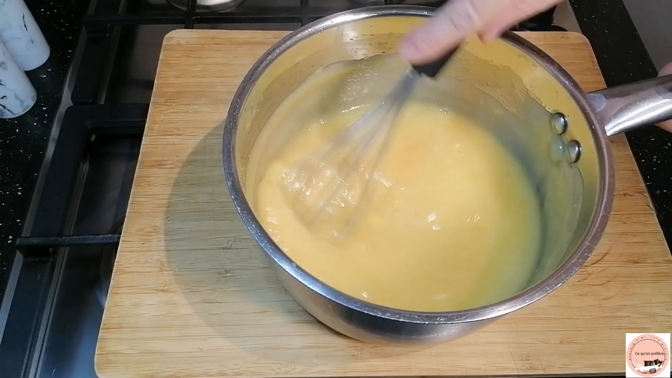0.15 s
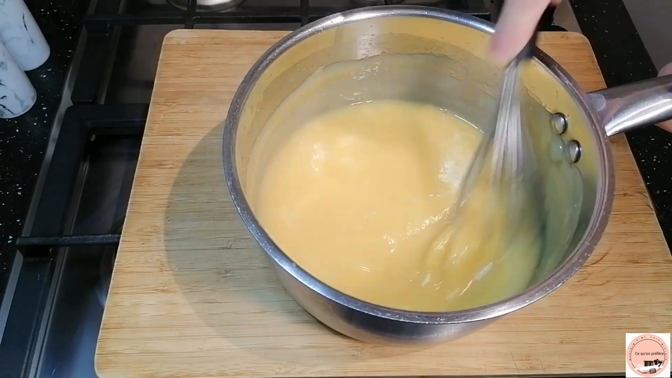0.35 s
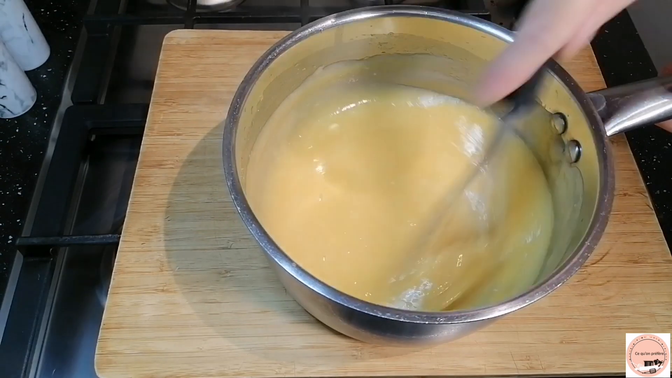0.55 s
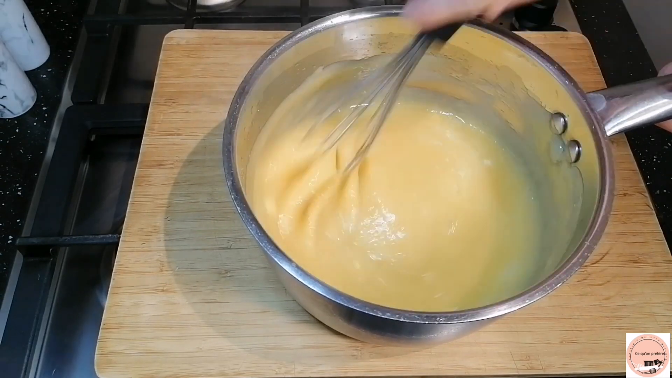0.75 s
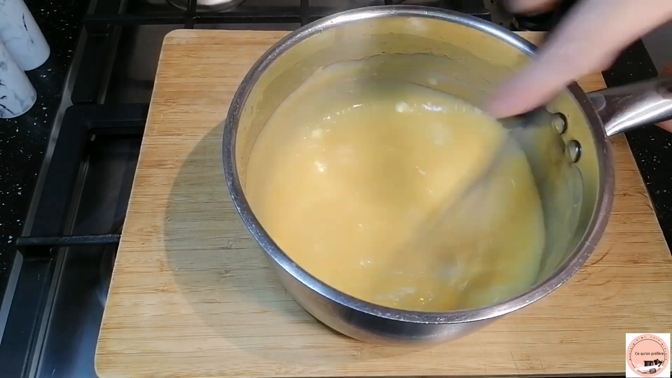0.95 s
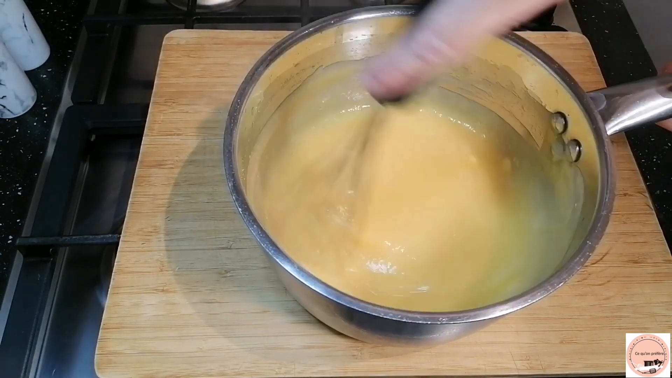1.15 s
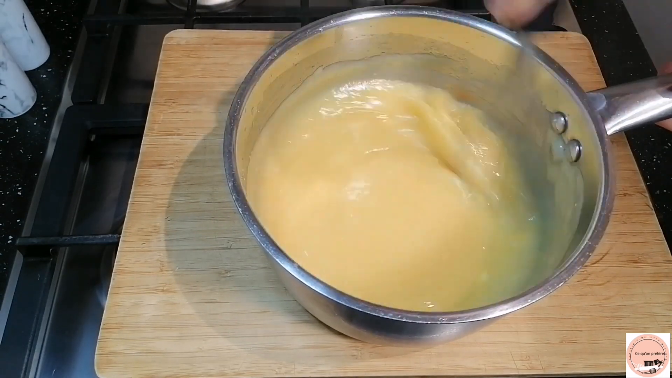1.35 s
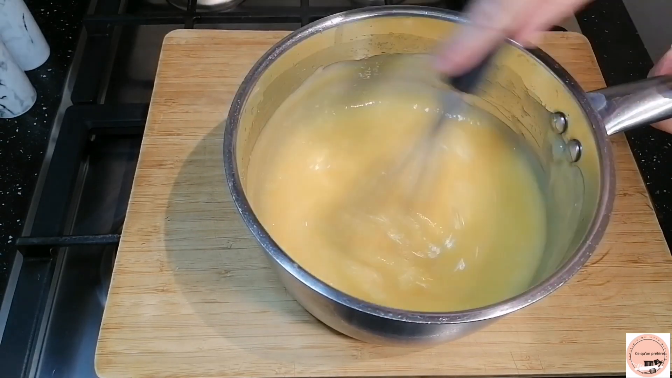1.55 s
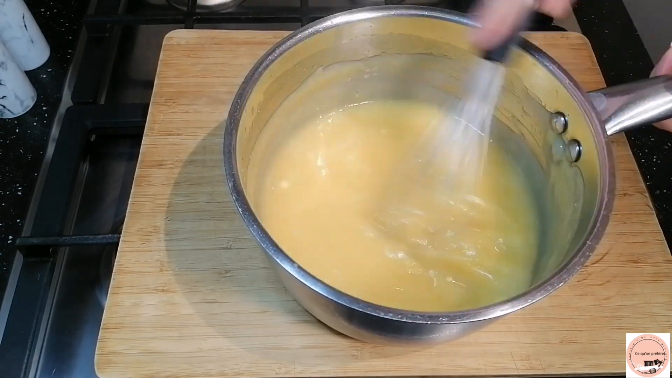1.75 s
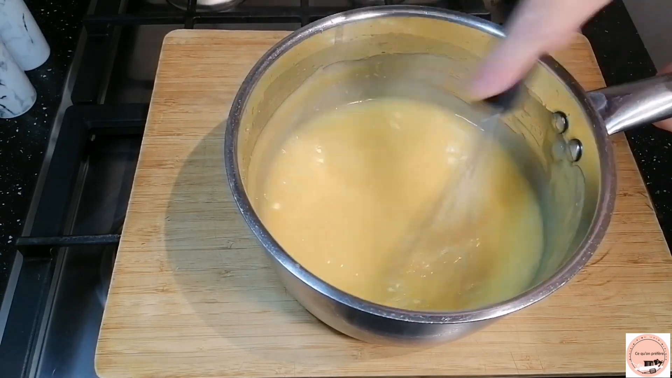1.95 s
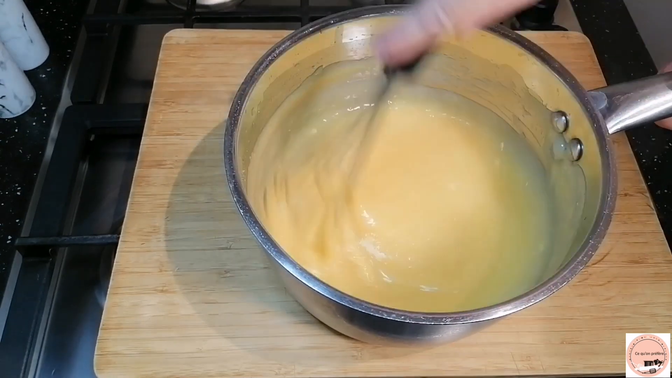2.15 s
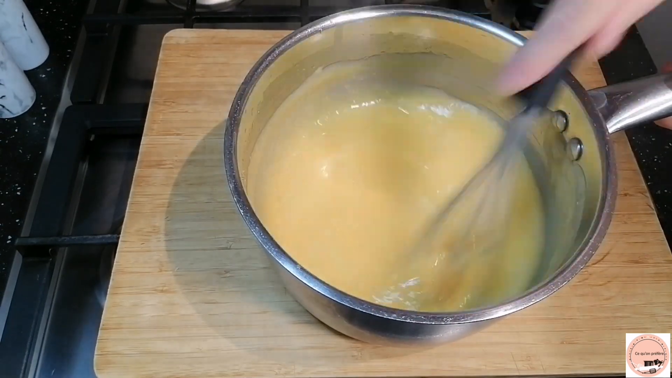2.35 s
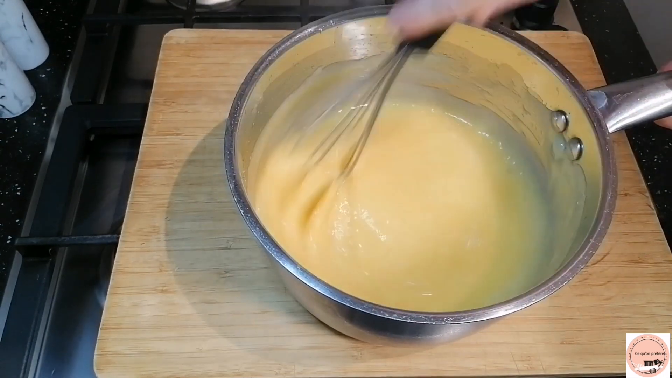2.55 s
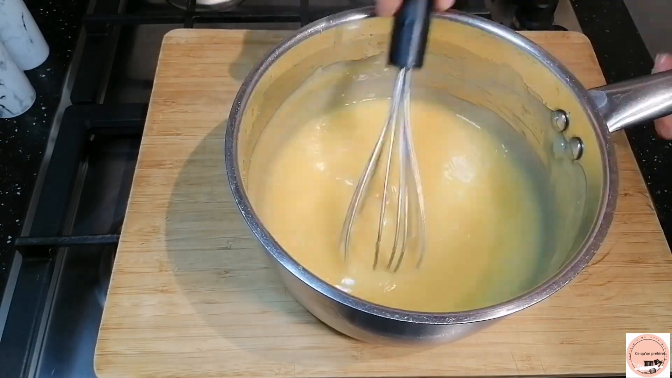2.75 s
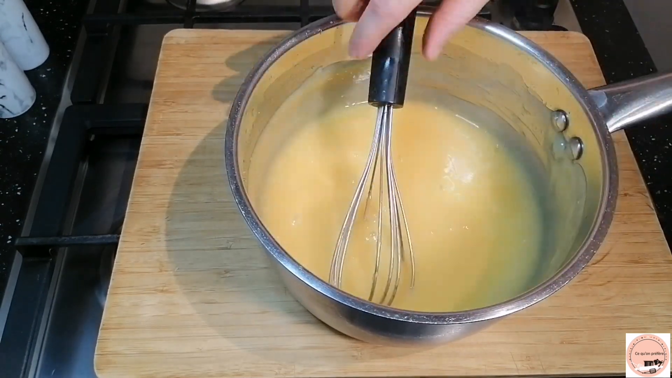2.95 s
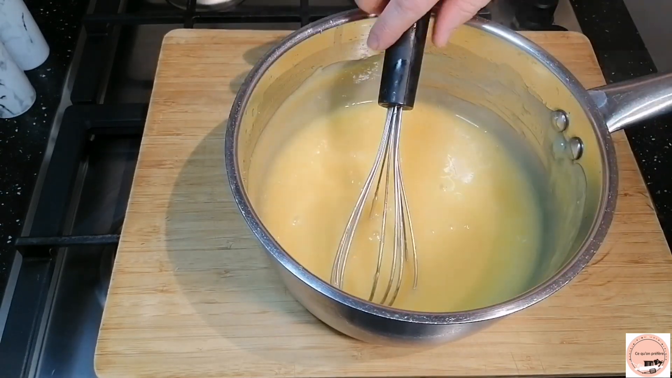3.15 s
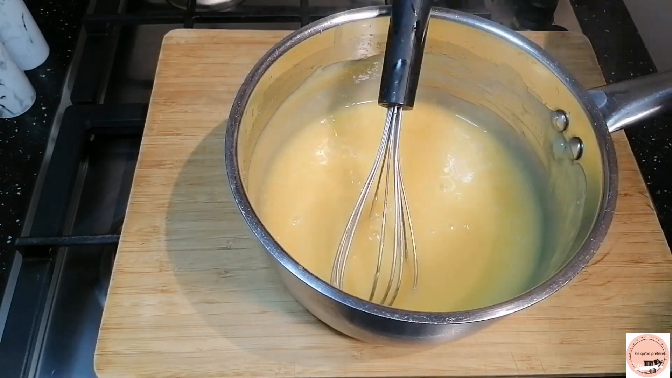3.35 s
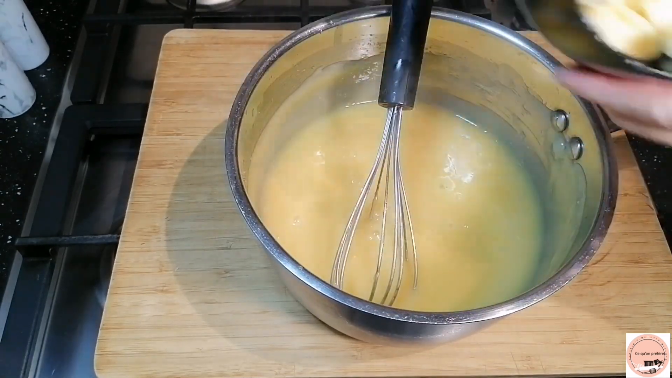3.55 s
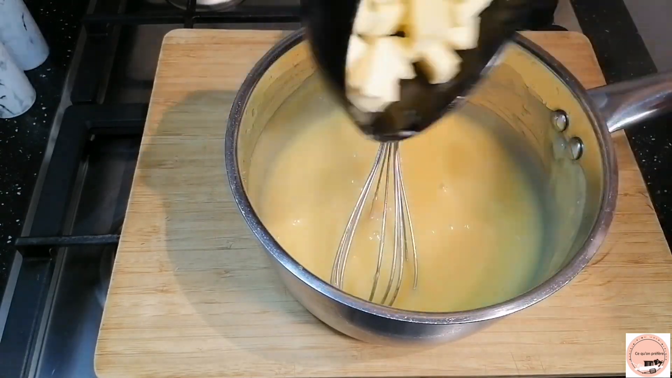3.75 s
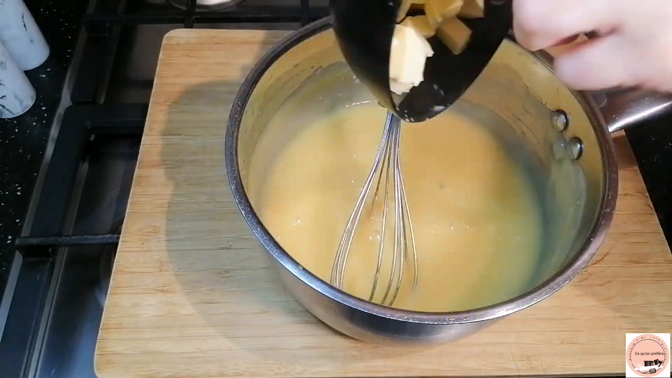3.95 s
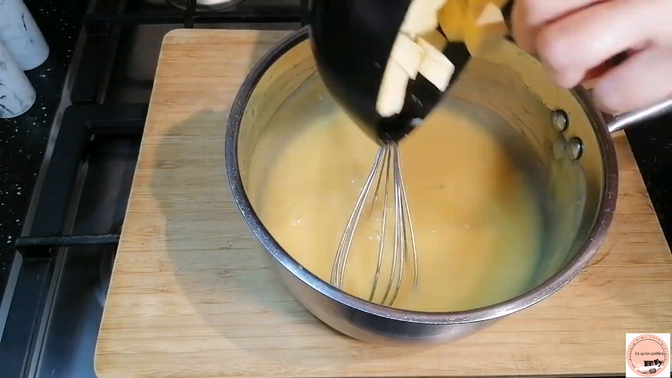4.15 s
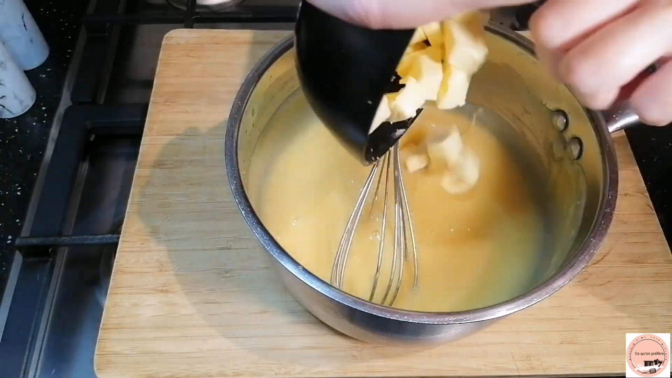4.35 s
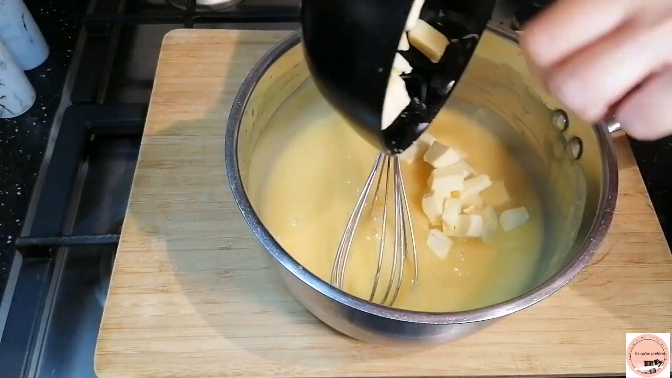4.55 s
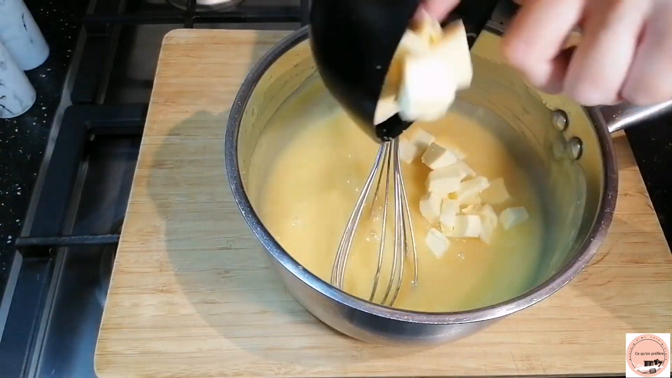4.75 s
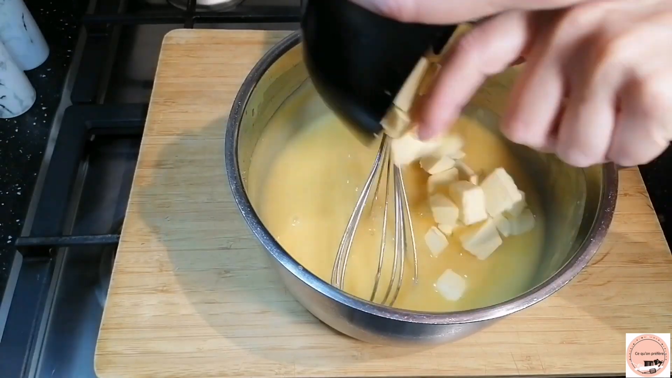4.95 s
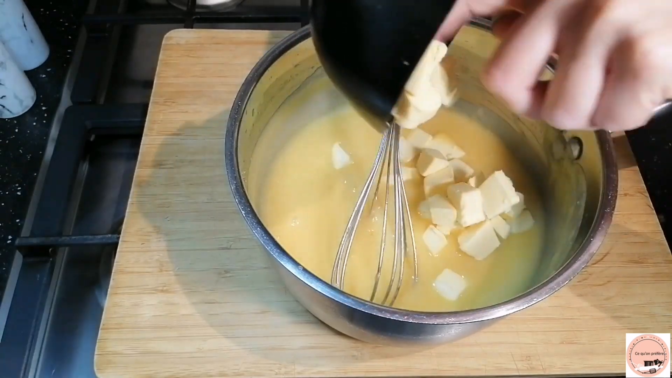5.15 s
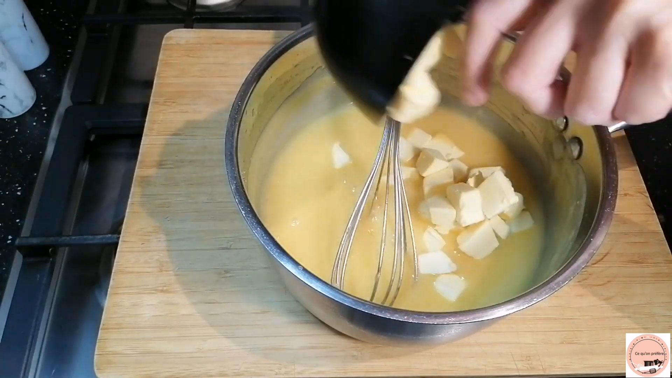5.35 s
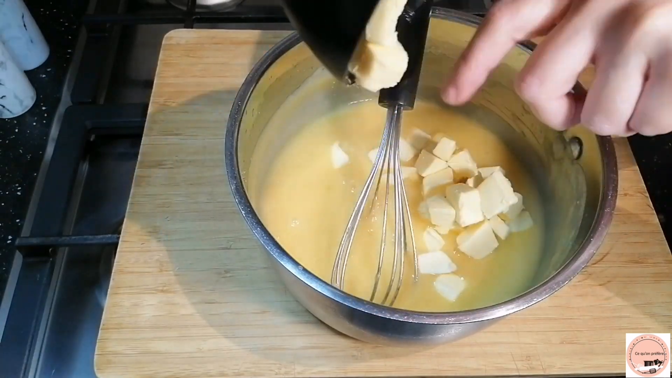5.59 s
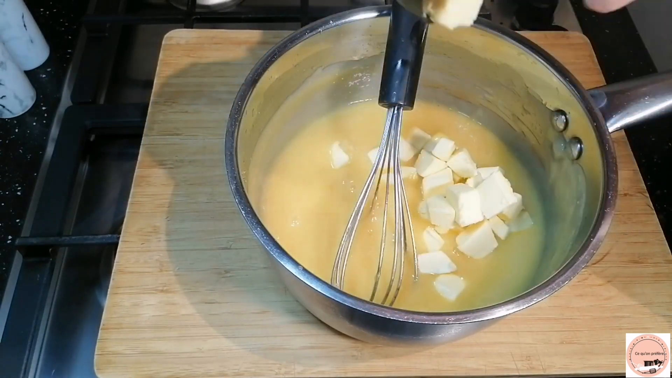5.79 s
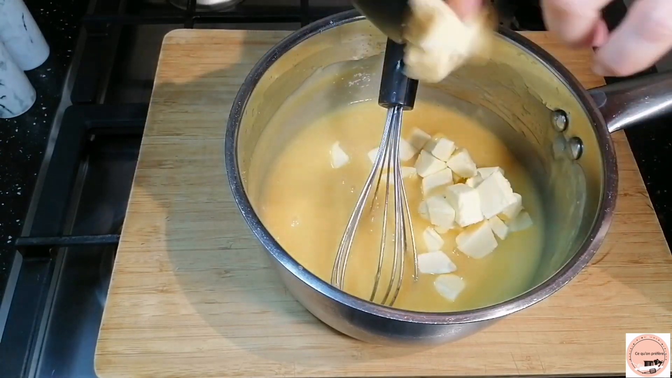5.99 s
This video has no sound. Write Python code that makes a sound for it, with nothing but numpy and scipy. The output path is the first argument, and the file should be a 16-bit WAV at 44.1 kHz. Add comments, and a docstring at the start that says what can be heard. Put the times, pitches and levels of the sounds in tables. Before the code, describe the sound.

Close up in a quiet kitchen, a wire whisk beats thick cream in a steel saucepan: quick bright scrapes, thin wire ringing, pan taps and soft gurgles, with dull bumps on a wooden board. It slows, and the dropped handle clatters sharply on the rim. Then quiet hush, faint rubbing and squeaks of a plastic bowl, and small sticky smacks as butter cubes drop into the cream.

```python
"""A wire whisk beats thick cream in a steel saucepan on a wooden board: sliding and tapping wires excite a bright
hiss, wire ring and pan ring, cream gurgles as bending resonances, and bumps are damped low sines.
The whisk is let go and its handle chatters on the rim: impulses, noise cracks and damped pan modes.
Then a plastic bowl is handled with rubs, squeaks and clacks, and butter cubes smack and plop into the cream.
A quiet kitchen, heard from close by: a steady coloured-noise hush and a faint noise-tail reverb."""
import sys
import numpy as np
from scipy import signal
from scipy.fft import rfft, irfft, next_fast_len
from scipy.io import wavfile
from scipy.ndimage import map_coordinates

SR = 44100
rng = np.random.default_rng(int(sys.argv[2]) if len(sys.argv) > 2 else 0)


def dump(signal):
    """Clip the signal to [-1, 1] and save it as 16-bit WAV at the path in sys.argv[1]."""
    limited = np.clip(np.atleast_2d(signal).T, -1, 1)
    pcm = np.round(limited * 32767).astype(np.int16)
    wavfile.write(sys.argv[1], SR, pcm)


N = 265482
TIME = np.arange(N) / SR
SIZE = 2 * next_fast_len((N + SR) // 2)  # FFT length [samples]
HZ = np.fft.rfftfreq(SIZE, 1 / SR)
TOP_HZ = 15900

# wires sliding over the pan, one after another: (middle [s], hiss level [dB], pan ring level [dB])
SCRAPES = [(0.015, -40, -50), (0.049, -39.0, -46), (0.094, -38, -64.5), (0.161, -38.5, -43),
           (0.213, -42.0, -57), (0.267, -41, -75), (0.317, -41.5, -51.5), (0.353, -44, -55.5),
           (0.481, -43, -54.5), (0.539, -42.5, -44), (0.592, -42.0, -55.5), (0.627, -37, -49),
           (0.685, -40, -66), (0.737, -38.5, -49), (0.805, -38.5, -53), (0.849, -38.5, -43),
           (0.894, -38.5, -53), (0.94, -39, -58), (0.984, -41.0, -48), (1.038, -40.5, -49),
           (1.11, -38.5, -49), (1.207, -39.5, -51.5), (1.259, -40, -45), (1.327, -39.0, -45.5),
           (1.379, -41.5, -45.5), (1.444, -44.0, -48.5), (1.492, -42.5, -45.5), (1.574, -43.5, -60),
           (1.621, -40, -79), (1.676, -39.5, -67), (1.735, -38.0, -63), (1.79, -38, -55),
           (1.845, -39.0, -73), (1.891, -38, -55), (1.938, -39, -77), (2.03, -40.5, -69),
           (2.068, -41, -50.5), (2.119, -37.5, -45), (2.173, -39.5, -48.5), (2.229, -43, -63),
           (2.282, -38, -49.5), (2.358, -39, -56.0), (2.419, -40, -47), (2.454, -44.5, -48),
           (2.508, -39.0, -49), (2.57, -45, -49), (2.614, -44.5, -56.0), (2.679, -42, -52.5),
           (2.725, -48.5, -69), (2.769, -48.5, -52), (2.812, -59, -68)]
# spectra, normalised to unit power on use: (frequency [Hz], density [dB per Hz])
HISS_SPECTRUM = [(2240, -22.5), (3800, -19), (4950, -5.5), (6610, -1.5), (7500, 3.5), (8820, -10),
                 (9830, -6.5), (11000, -14), (15000, -14), (15900, -27)]
PAN_SPECTRUM = [(240, -26.5), (400, -18), (600, 0), (1160, -11), (1550, -11.5), (1920, -25.5),
                (2200, -18.5), (3500, -77)]
SLOSH_SPECTRUM = [(22, -39), (100, -15), (200, -13), (330, -5.5), (500, -3.5), (800, -17), (4000, -64)]
# resonances of filled pan and whisk, negative = antiresonance: (frequency [Hz], width [Hz], lift [dB])
STEEL_MODES = [(591, 99, 9.5), (735, 27, -2), (1076, 150, 6.5), (1301, 77, 9), (1914, 140, 6),
               (2990, 146, 6), (3470, 280, 6), (3716, 320, -4.5), (6510, 64, 10.5)]
# 1/e widths of the swells of single wire and wall notes
WIRE_NOTE_S, WALL_NOTE_S = .04, .022


def amp(db):
    """Decibels to gain."""
    return 10 ** (np.asarray(db) / 20)


def unit(x):
    """Scaled to rms 1."""
    return x / np.sqrt(np.mean(np.abs(x) ** 2) + 1e-20)


def along(points, hz=HZ):
    """(Hz, value) points joined on a log frequency axis."""
    f, v = np.transpose(points)
    return np.interp(np.log(hz + 1), np.log(f + 1), v)


def add(track, s, x):
    """Mix x into the track from time s."""
    i = round(s * SR)
    a, b = max(i, 0), min(i + x.shape[-1], N)
    track[..., a:b] += x[..., a - i:b - i]


def colour(x, spectrum, modes=()):
    """Minimum-phase filter of unit power: a smooth spectrum with resonances on it."""
    lift = sum(db / (1 + (2 * (HZ - hz) / width) ** 2) for hz, width, db in modes)
    gain = unit(amp(along(spectrum) + lift))
    # folding the cepstrum makes the filter causal
    cepstrum = irfft(np.log(np.maximum(gain, 1e-6)))
    cepstrum[1:SIZE // 2] *= 2
    cepstrum[SIZE // 2 + 1:] = 0
    response = np.exp(rfft(cepstrum))
    return irfft(rfft(x, SIZE) * response)[..., :N]


def stereo(pair, alike, lean):
    """A mid and side pair becomes left and right by likeness and balance; the mean keeps its level."""
    like = np.clip(along(alike), -.5, .99)
    width = np.sqrt((1 - like) / (1 + like))
    g = amp(along(lean) / 2)
    mid, side = rfft(pair, SIZE)
    norm = np.hypot(g + 1 / g, width * (g - 1 / g)) / 2
    left = (mid + width * side) * g
    right = (mid - width * side) / g
    return irfft(np.array([left, right]) / norm)[:, :N]


def swell(t, length_s):
    """Contact pressure around t = 0, of 1/e width length_s: it builds faster than it lets go."""
    skew = .38
    u = 2 * t / length_s + skew
    return np.exp(-(u / (1 + skew * np.sign(u))) ** 2)


def strike(t, build_s, t60_s):
    """Envelope of a tap: the wire presses in, then the ring dies."""
    return np.minimum(t / abs(build_s), 1) * amp(-60 * np.maximum(t - build_s, 0) / t60_s)


def burst(t60_s):
    """A pair of noise cracks that decay by 60 dB in t60_s."""
    t = np.arange(SR // 8) / SR
    return rng.standard_normal((2, len(t))) * amp(-60 * t / t60_s)


def ringing(n, ring_db, ring_hz):
    """Spectrum of a noise pair with chance resonances about ring_hz apart: every contact rings differently."""
    hz = np.fft.rfftfreq(n, 1 / SR)
    resonances = np.tanh(map_coordinates(rng.standard_normal(n), [hz / ring_hz], order=1))
    return rfft(rng.standard_normal((2, n))) * amp(ring_db * resonances)


def friction(length_s, ring_db, ring_hz, rough_db, slip_hz, glide):
    """One slide, centred in 0.2 s: uneven slips excite chance resonances, which bend in pitch."""
    n = SR // 5
    t = np.arange(n) / SR - 1 / 10
    rung = irfft(ringing(n, ring_db, ring_hz), 4 * n)  # 4x oversampled
    place = 4 * SR * (t + 1 / 10 + glide * rng.normal() * t ** 2)
    bent = np.array([np.interp(place, np.arange(len(r)), r) for r in rung])
    slips = map_coordinates(rng.standard_normal(n), [np.arange(n) * slip_hz / SR], order=1)
    judder = map_coordinates(rng.standard_normal(n), [np.arange(n) * 110 / SR], order=1)
    pressure = swell(t, length_s)
    x = bent * amp(rough_db * slips + 1.7 * judder) * pressure
    return unit(x) * np.sqrt(np.mean(pressure ** 2))


def note(length_s, hz, bend, fray):
    """A brief ring of wire or pan wall, centred in 0.2 s: pitch bends with flexing, slips fray the phase."""
    t = np.arange(SR // 5) / SR - 1 / 10
    drift = np.cumsum(fray * rng.standard_normal((2, len(t))), axis=1)
    bent_t = t + bend * rng.normal() * t ** 2
    return swell(t, length_s) * np.sin(2 * np.pi * hz * bent_t + drift)


def scrape_wires(hiss, wire, pan, notes):
    """Each sliding wire hisses, sings a note of its own and rings the cream-loaded pan lower down."""
    # how freely the wires sing, less when buried in the cream: (time [s], ring against hiss [dB])
    singing = [(.15, -3.5), (.45, -14), (.75, -7.5), (1.05, -15.5), (1.58, -6), (2.05, -9), (2.78, -4.5)]
    scrape_s, wire_ring_s, wire_stagger_s = .042, .046, .008
    # centre pitch, standard deviation of log pitch, level against wire or pan ring
    wire_hz, wire_spread, wire_note_db = 3295, .05, -6.5
    pan_hz, pan_spread, pan_note_db = 877, .35, -7.5
    for s, hiss_db, pan_db in SCRAPES:
        start = s - 1 / 10
        sings = start + wire_stagger_s * rng.normal()
        wire_db = hiss_db + np.interp(s, *np.transpose(singing))
        slide = friction(scrape_s, ring_db=10, ring_hz=130, rough_db=3, slip_hz=900, glide=.08)
        add(hiss, start, amp(hiss_db) * slide)
        wire_ring = friction(wire_ring_s, ring_db=20, ring_hz=130, rough_db=1, slip_hz=300, glide=.2)
        add(wire, sings, amp(wire_db - 5.5) * wire_ring)
        pan_ring = friction(.85 * scrape_s, ring_db=16, ring_hz=90, rough_db=2, slip_hz=200, glide=.9)
        add(pan, start, amp(pan_db) * pan_ring)
        high, low = rng.uniform(-np.sqrt(3), np.sqrt(3), 2)  # unit variance
        wire_note = note(WIRE_NOTE_S, wire_hz * np.exp(wire_spread * high), bend=.2, fray=.05)
        add(notes, sings, amp(wire_db + wire_note_db) * wire_note)
        pan_note = note(WALL_NOTE_S, pan_hz * np.exp(pan_spread * low), bend=.7, fray=.03)
        add(notes, start, amp(pan_db + pan_note_db) * pan_note)


def clear_notes(notes):
    """A wire catches and the pan wall sings one note, or a wire springs free and sings itself."""
    # clear notes: (middle [s], frequency [Hz], level [dB])
    wall_notes = [(.167, 823, -45), (0.271, 1264, -48), (.532, 714, -47), (.68, 1260, -48),
                  (1.075, 1480, -46.5), (1.88, 1053, -45.5), (1.939, 1288, -48), (2.514, 740, -42.5),
                  (2.785, 1824, -53)]
    wire_notes = [(.048, 3090, -50.5), (.097, 3290, -61), (.562, 3435, -48), (.658, 3477, -46),
                  (.87, 3130, -52), (.915, 3440, -42), (1.573, 2980, -47), (1.726, 3079, -44),
                  (2.27, 3025, -52.5)]
    for table, length_s in ((wall_notes, WALL_NOTE_S), (wire_notes, WIRE_NOTE_S)):
        for s, hz, db in table:
            add(notes, s - 1 / 10, amp(db) * note(length_s, hz, bend=.3, fray=.03))


def tap_pan(hiss, wire, pan, notes):
    """A wire strikes the pan: noise ticks, plus base and wall rings that the cream damps quickly."""
    # strikes: (time [s], tick level [dB], base ring level [dB], wall ring frequency [Hz],
    # wall ring level [dB], contact build [s])
    taps = [(0.374, -25.5, -44, 1055, -41, 0.0021), (.646, -41.5, -35, 810, -37, 0.0012),
            (0.768, -30.5, -28.5, 886, -34.5, 0.0027), (1.062, -31, -36.5, 1050, -39.5, 0.0066),
            (1.249, -46, -68, 744, -45.5, 0.0022), (1.389, -35.5, -52, 740, -40.5, 0.011),
            (1.537, -29.5, -36, 1272, -45, 0.0069), (2.11, -28, -36.5, 1400, -55, 0.0079),
            (2.18, -45, -35, 725, -38, 0.014), (2.308, -30.5, -34, 872, -36, 0.003),
            (2.644, -25, -34, 1082, -47, 0.0086)]
    base_hz, base_t60_s = 588.5, .056
    t = np.arange(SR // 8) / SR
    for s, tick_db, base_db, wall_hz, wall_db, build_s in taps:
        bright = unit(irfft(ringing(len(t), 8, 350), len(t)))
        dull = unit(irfft(ringing(len(t), 8, 130), len(t)))
        add(hiss, s, amp(tick_db - 2) * bright * strike(t, build_s, t60_s=.04))
        add(wire, s, amp(tick_db - 19) * bright * strike(t, build_s, t60_s=.045))
        add(pan, s, amp(base_db - 2.5) * dull * strike(t, build_s, t60_s=.05))
        for hz, db in ((base_hz, base_db), (wall_hz, wall_db)):
            add(notes[0], s, amp(db) * np.sin(2 * np.pi * hz * t) * strike(t, build_s, base_t60_s))


def click_wires(hiss):
    """Wires click against each other: short noise bursts."""
    # clicks: (time [s], level [dB])
    clicks = [(0.51, -32.5), (1.099, -30), (1.177, -32.5), (1.3, -35), (2.335, -40), (2.402, -39)]
    for s, db in clicks:
        add(hiss, s, amp(db) * burst(t60_s=.046))


def swish(hiss, pan):
    """Between scrapes the wires keep swishing through the cream: steady noise that fades as the whisk stops."""
    # the whisk slows and stops: (fade start [s], fade end [s])
    stop_s = [2.35, 2.84]
    stirring = np.interp(TIME, stop_s, [1, 0])
    for track, db in ((hiss, -53), (pan, -60)):
        add(track, 0, amp(db) * stirring * rng.standard_normal((2, N)))


def whisk():
    """Scrapes, taps, clicks and swish drive a bright hiss, the ring of the wires and the lower pan ring."""
    # wire ring spectrum: (frequency [Hz], density [dB per Hz])
    wire_spectrum = [(1120, -39), (1900, -8), (2150, -15), (2600, -4), (3500, -6.5), (3900, -15),
                     (6000, -74)]
    hiss, wire, pan, notes = np.zeros((4, 2, N))
    scrape_wires(hiss, wire, pan, notes)
    clear_notes(notes)
    tap_pan(hiss, wire, pan, notes)
    click_wires(hiss)
    swish(hiss, pan)
    bright = colour(hiss, HISS_SPECTRUM, STEEL_MODES) + colour(wire, wire_spectrum, STEEL_MODES)
    return bright + colour(pan, PAN_SPECTRUM, STEEL_MODES) + notes


def cream():
    """Air pockets gurgle, gliding in pitch: faintly behind each wire, louder where cream slops over."""
    # whisk slopping the cream over, or butter sliding into it: (middle [s], level [dB])
    slops = [(.466, -46), (.605, -48), (0.978, -47), (1.077, -45.5), (1.385, -48), (2.029, -45.5),
             (5.247, -58.5)]
    slop_s, churn_db = .029, -15.5  # churn level is against the pan ring
    slosh = np.zeros((2, N))
    for s, db in slops:
        slop = friction(slop_s, ring_db=8, ring_hz=60, rough_db=2, slip_hz=200, glide=4)
        add(slosh, s - 1 / 10, amp(db) * slop)
    for s, _, pan_db in SCRAPES:
        churn = friction(2 * slop_s, ring_db=8, ring_hz=70, rough_db=3, slip_hz=200, glide=2)
        add(slosh, s - 1 / 10, amp(pan_db + churn_db) * churn)
    return colour(slosh, SLOSH_SPECTRUM)


def kitchen_hush():
    """Steady background: coloured noise, nearly unrelated left and right above the bass."""
    # spectrum: (frequency [Hz], density [dB per Hz])
    floor_spectrum = [(12, -30.5), (20, -4.5), (74, -4), (198, -12), (642, -20.5), (1530, -27),
                      (7730, -33.5), (15500, -37)]
    # a hollow and a hump: (frequency [Hz], width [Hz], lift [dB])
    hush_modes = [(4200, 540, -5.5), (6800, 1000, 4.5)]
    # stereo: (frequency [Hz], left-right likeness [-]) and (frequency [Hz], left minus right [dB])
    floor_alike = [(60, 0.392), (950, 0.026)]
    floor_lean = [(60, 2), (950, 0)]
    noise = rng.standard_normal((2, N))
    return stereo(colour(noise, floor_spectrum, hush_modes), floor_alike, floor_lean)


def kitchen_reverb(x):
    """The walls answer: convolution with a noise tail whose bass lasts longest."""
    # decay: (frequency [Hz], t60 [s])
    decay = [(100, 1), (250, 0.15), (10000, 0.1)]
    hz, t, z = signal.stft(rng.standard_normal((2, SR // 2)), SR, nperseg=256)
    z = z * amp(-60 * t / along(decay, hz)[:, None])
    tail = signal.istft(z, SR, nperseg=256)[1]
    tail = np.pad(tail / np.linalg.norm(tail[0]), ((0, 0), (SR // 150, 0)))  # 1/150 s pre-delay
    return signal.fftconvolve(x[:1], tail, axes=1)[:, :N]


def board(board_hz=99, thump_db=7, thud_db=-3):
    """Pan bumps on the board: a damped bounce near board_hz over a shorter 70 Hz thud."""
    # pan pushed and rocking back: (time [s], level [dB])
    bumps = [(0.43, -40.5), (0.566, -35), (0.601, -40), (0.974, -42), (.998, -41), (1.134, -46),
             (1.249, -43.5), (1.389, -42.5), (1.498, -48.5), (2.012, -36.5), (2.135, -42.5), (2.888, -39.5),
             (4.392, -46.5), (4.512, -52), (4.882, -49), (4.995, -52.5)]
    thump, t = np.zeros((2, N)), np.arange(SR // 2) / SR
    for s, db in bumps:
        hz = board_hz * (1 + .06 * rng.normal())
        bounce = np.sin(2 * np.pi * hz * t) * amp(-60 * t / .19) * (1 - np.exp(-t / .014))
        thud = np.sin(2 * np.pi * 70 * t) * amp(-60 * t / .1) * (1 - np.exp(-t / .005))
        add(thump[0], s, amp(db + thump_db) * bounce + amp(db + thud_db) * thud)
    return thump


def knock(blow_db=-20, push_db=1, ring_db=-32):
    """Handle chatters on the rim: each contact is an impulse, a crack and pan modes scattered in pitch."""
    # contacts: (time [s], level [dB])
    contacts = [(2.8657, -24), (2.87, -13.5), (2.876, -10.5), (2.8812, -6), (2.888, -11), (2.9045, -20.5)]
    # nominal modes of the pan struck on its rim: (frequency [Hz], level [dB], t60 [s])
    rim_modes = [(180.2, -5.5, 0.14), (276.7, -7.5, 0.19), (565, 10, 0.07), (848, 2, 0.08),
                 (1047, 10, 0.054), (1270, 8.5, 0.071), (1596, -1, 0.06), (2830, -2, 0.063)]
    # crack spectrum: (frequency [Hz], density [dB per Hz])
    blow_spectrum = [(90, -42), (170, -14), (290, 1), (420, -14.5), (580, 6), (1000, -4.5), (1500, -15.5),
                     (2700, -21.5), (4200, -34.5), (5700, -21.5), (7500, -28.5), (13000, -60)]
    crack, ring = np.zeros((2, 2, N))
    t = np.arange(SR // 2) / SR
    hz, level_db, t60_s = np.transpose(rim_modes)[:, :, None]
    for s, db in contacts:
        add(crack, s, amp(db + blow_db) * burst(t60_s=.053))
        crack[0, round(s * SR)] += amp(db + push_db)
        strength = amp(level_db + db + ring_db) * rng.choice([-1, 1], (2, len(rim_modes), 1))
        scattered_hz = hz * (1 + .025 * rng.standard_normal(hz.shape))
        modes = strength * np.sin(2 * np.pi * scattered_hz * t) * amp(-60 * t / t60_s)
        add(ring, s, np.sum(modes, axis=1))
    return colour(crack, blow_spectrum) + ring


def handling():
    """Fingers rub bowl and handle (friction), squeak (paired sines) and clack on plastic (noise bursts)."""
    # soft rubs of fingers, bowl and handle: (middle [s], level [dB])
    rubs = [(3.184, -64.5), (3.658, -66.5), (4.098, -63), (4.889, -69), (5.008, -61), (5.465, -66),
            (5.91, -60)]
    # thin squeaks: (middle [s], length [s], lower frequency [Hz], upper frequency [Hz], level [dB])
    squeak_events = [(3.458, 0.074, 5870, 8220, -63.5), (5.125, 0.025, 6330, 9600, -69.5),
                     (5.296, 0.021, 6330, 9840, -64)]
    # fingers clacking on the bowl: (time [s], level [dB])
    clacks = [(4.482, -58), (4.493, -69.5), (4.901, -61.5), (5.033, -68)]
    # spectra of rub and bowl: (frequency [Hz], density [dB per Hz])
    hollow_spectrum = [(250, -28), (600, 2), (880, 7), (1250, -5), (1800, -17.5), (8000, -33)]
    plastic_spectrum = [(400, -4.5), (1400, -6.5), (3500, -13), (7000, -23)]
    rub_s, rub_hiss_db = .048, -10.5  # hiss level is against the hollow tone
    hollow, hiss, squeaks, clack = np.zeros((4, 2, N))
    t = np.arange(SR // 5) / SR - 1 / 10
    for s, db in rubs:
        tone = friction(rub_s, ring_db=7, ring_hz=90, rough_db=3, slip_hz=300, glide=.3)
        add(hollow, s - 1 / 10, amp(db) * tone)
        rustle = friction(rub_s, ring_db=2, ring_hz=300, rough_db=4, slip_hz=600, glide=.1)
        add(hiss, s - 1 / 10, amp(db + rub_hiss_db) * rustle)
    for s, length_s, low_hz, high_hz, db in squeak_events:
        for hz in (low_hz, high_hz):
            drift = np.cumsum(.07 * rng.standard_normal((2, len(t))), axis=1)
            squeak = swell(t, length_s) * np.sin(2 * np.pi * hz * t + drift)
            add(squeaks, s - 1 / 10, amp(db) * squeak)
    for s, db in clacks:
        add(clack, s, amp(db) * burst(t60_s=.1))
    rubbed = colour(hollow, hollow_spectrum) + colour(hiss, HISS_SPECTRUM)
    return rubbed + colour(clack, plastic_spectrum) + squeaks


def butter(plop_t60_s=.099, plop_rise=3):
    """Sticky cubes smack (noise) and plop: a closing cavity rises in pitch, then cream closes over it, lower."""
    # sticky butter letting go or landing: (time [s], level [dB])
    smack_events = [(4.3469, -36), (4.383, -37), (4.48, -33.5), (5.0333, -40.5), (5.0479, -36.5),
                    (5.355, -51.5)]
    # butter landing in the cream: (time [s], level [dB], initial cavity frequency [Hz])
    plop_events = [(4.949, -52, 506), (5.594, -60.5, 498)]
    gulp_s, gulp_pitch = .0092, .79  # delay and pitch ratio against the plop
    plops, splash, smacks = np.zeros((3, 2, N))
    t = np.arange(SR // 8) / SR
    for s, db in smack_events:
        add(smacks, s, amp(db - 13.5) * burst(t60_s=.042))
    for start, db, cavity_hz in plop_events:
        for s, hz in ((start, cavity_hz), (start + gulp_s, cavity_hz * gulp_pitch)):
            rising = np.sin(2 * np.pi * hz * (t + plop_rise * t ** 2))
            add(plops[0], s, amp(db) * rising * amp(-60 * t / plop_t60_s))
            add(splash, s, amp(db + 3) * burst(t60_s=.044))
    smacked = colour(smacks, HISS_SPECTRUM) + amp(-11) * colour(smacks, PAN_SPECTRUM, STEEL_MODES)
    return plops + colour(splash, SLOSH_SPECTRUM) + smacked


def scene(room_db=-19, floor_db=-68):
    """Near sources and their reverb share one stereo image, over the steady hush."""
    # stereo: (frequency [Hz], left-right likeness [-]) and (frequency [Hz], left minus right [dB])
    near_alike = [(60, 0.75), (700, 0.74), (1300, 0.11), (5000, 0)]
    near_lean = [(170, 5.5), (400, -4), (580, 3.5), (1130, 8.5), (1800, -0.5), (3400, -2), (5000, -4.5),
                 (7000, -16), (9700, -1.5), (15000, -3)]
    near = whisk() + cream() + board() + knock() + handling() + butter()
    roomy = near + amp(room_db) * kitchen_reverb(near)
    return stereo(roomy, near_alike, near_lean) + amp(floor_db) * kitchen_hush()


def record(dry):
    """Band limit: nothing passes from TOP_HZ up."""
    return irfft(rfft(dry, SIZE) * (HZ < TOP_HZ))[:, :N]


dry = scene()
out = record(dry)
dump(out)
```